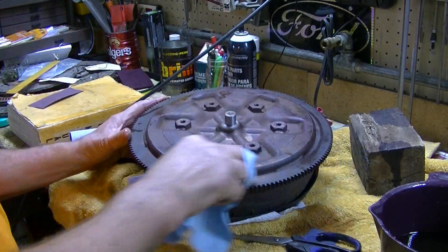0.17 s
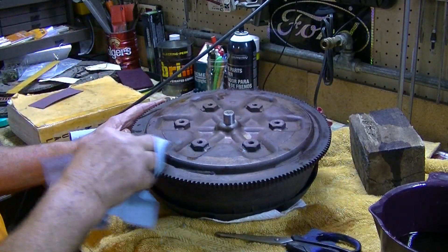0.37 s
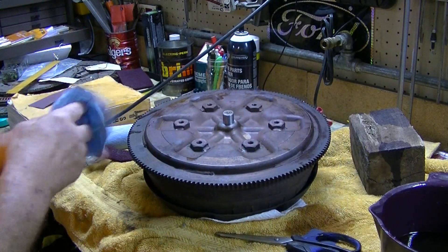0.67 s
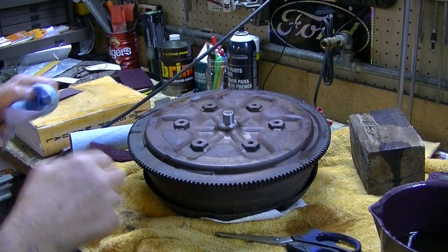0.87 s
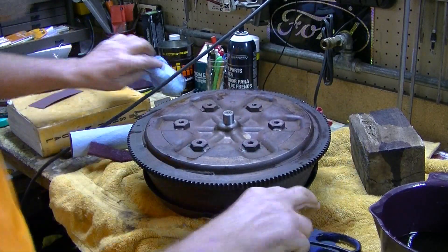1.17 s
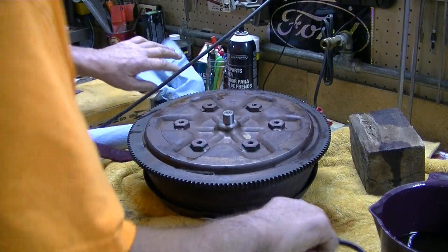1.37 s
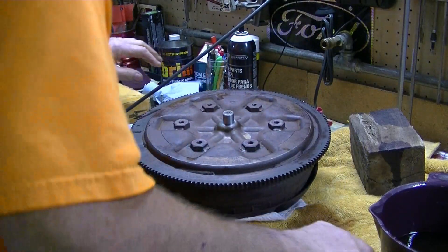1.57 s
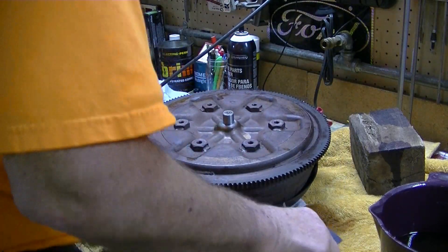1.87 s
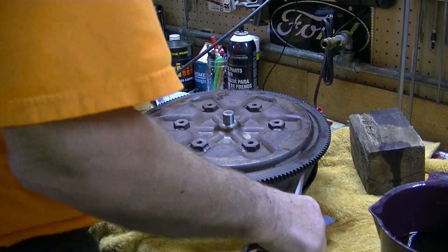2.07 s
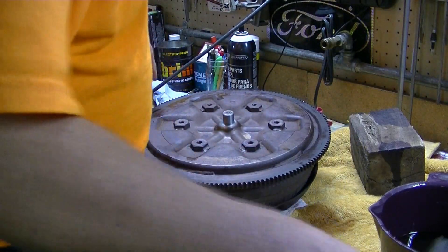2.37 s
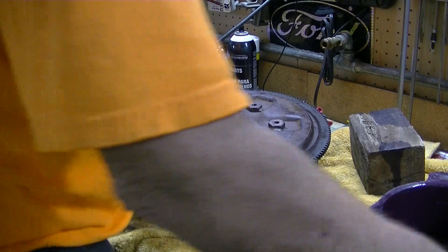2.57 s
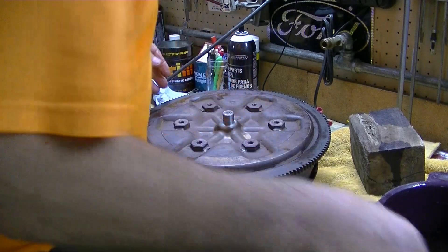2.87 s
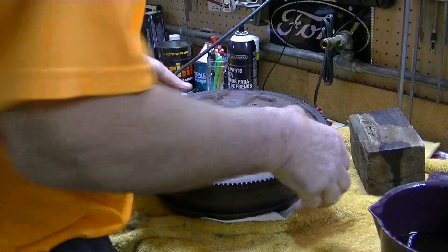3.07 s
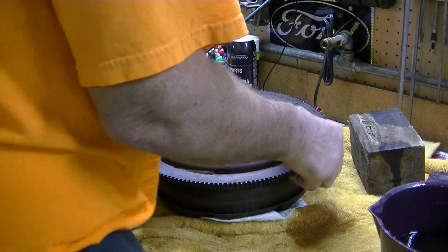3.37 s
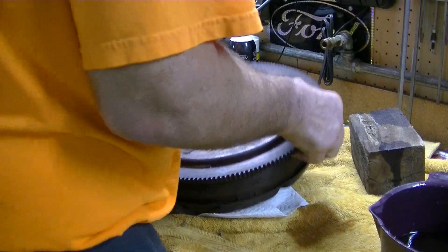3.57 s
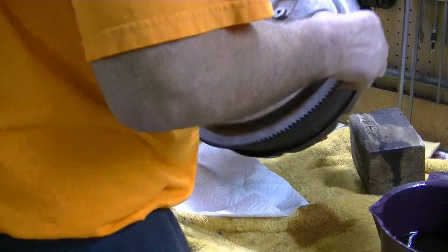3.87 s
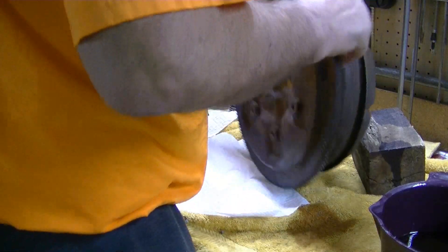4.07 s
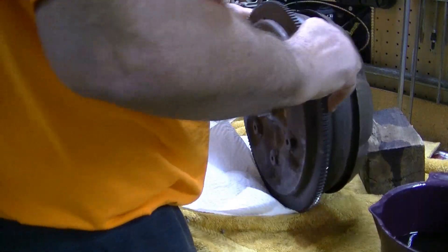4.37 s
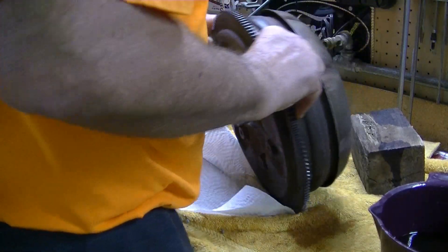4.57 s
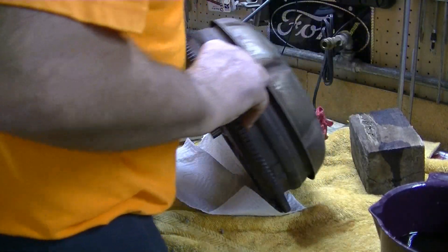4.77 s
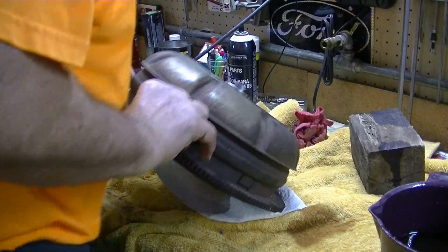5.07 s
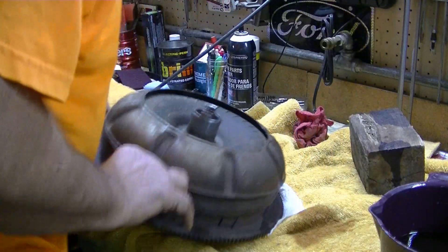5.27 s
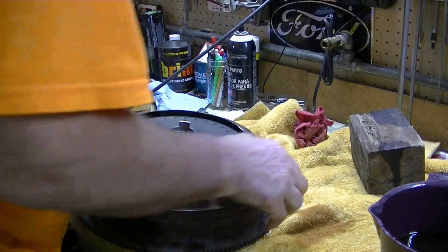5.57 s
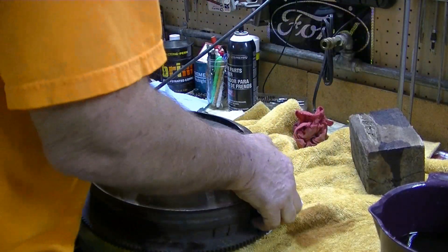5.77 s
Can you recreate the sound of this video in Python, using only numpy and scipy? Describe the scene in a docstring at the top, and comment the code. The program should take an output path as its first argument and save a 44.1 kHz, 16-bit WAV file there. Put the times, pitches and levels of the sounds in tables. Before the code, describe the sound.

Close to the camera microphone in a small garage, a rag hisses over metal and sleeves rustle. Sharp tool clacks peak just after two seconds, then tools clatter into a heap. A heavy steel part lands on its rim with a loud clank and thud, rocks with ringing knocks, and finally scrapes against a toothed plate as it is laid over. Faint lens ticking and hiss underneath.

```python
"""A garage workbench, close to a camera: a rag wipes a torque converter, sleeves and a towel rustle (shaped noise).
Steel hand tools clack and are pushed into a heap: grainy bursts through damped modes that then ring free.
The converter is tipped onto its rim, it clanks and rocks as it settles, and it is lowered upside down while the
flex plate scrapes and rings (noise-fed modes). Knocks and low thuds carry the weight on the bench.
The camera's lens drive ticks softly in three runs over quiet hiss."""
import sys
import numpy as np
from scipy import signal
from scipy.fft import rfft, irfft, next_fast_len
from scipy.io import wavfile
from scipy.ndimage import uniform_filter1d, map_coordinates

SR = 44100
rng = np.random.default_rng(int(sys.argv[2]) if len(sys.argv) > 2 else 0)


def inscribe(sig):
    """Save sig as 16-bit PCM at rate SR to the path in sys.argv[1].

    A 1-D sig is mono; a 2-D sig holds one channel per row.
    Samples are clipped to [-1, 1] before scaling.
    """
    pcm = np.round(np.clip(np.atleast_2d(sig).T, -1, 1) * 32767)
    wavfile.write(sys.argv[1], SR, pcm.astype(np.int16))


N = 260190

# noise colour of a bright steel crack: (frequency [Hz], level [dB])
CRACK_COLOUR = [(60, -55), (200, -35), (700, -70), (1300, -42), (1900, -3.5), (2800, -1), (4000, 7),
                (6000, 8), (7500, 2.5), (9500, -13.5), (12000, -17), (16000, -43)]
# noise colour of a dull knock: (frequency [Hz], level [dB])
KNOCK_COLOUR = [(60, -67.5), (160, -12), (300, -25.5), (600, -14.5), (1000, -2), (1700, 0), (3000, -8),
                (5000, -4.5), (12000, -25)]


def amp(db):
    """Decibels to an amplitude factor."""
    return 10 ** (np.asarray(db) / 20)


def unit(x):
    """Scale to an rms of 1."""
    return x / np.sqrt(np.mean(x ** 2) + 1e-20)


def along(points, hz):
    """Read (Hz, value) points on a log frequency axis."""
    f, v = np.transpose(points)
    return np.interp(np.log(hz + 1), np.log(f + 1), v)


def add(track, s, sound):
    """Mix a sound into a track from time s [s]."""
    part = track[..., max(round(s * SR), 0):][..., :sound.shape[-1]]
    part += sound[..., :part.shape[-1]]


def wobble(rate):
    """A smooth random curve through so many random knots a second."""
    knots = rng.standard_normal(int(N * rate / SR) + 4)
    return map_coordinates(knots, [np.arange(N) * rate / SR])


def filtered(x, response):
    """Multiply the spectrum by a (complex) response of frequency."""
    n = x.shape[-1]
    m = next_fast_len(n + SR // 8)
    return irfft(rfft(x, m) * response(np.fft.rfftfreq(m, 1 / SR)), m)[..., :n]


def resonate(x, peaks):
    """Pass x through parallel damped resonances (Hz, width Hz, dB) of alternating sign."""
    def response(f):
        total = 0
        for k, (centre, width, db) in enumerate(peaks):
            damping = 1j * f * width
            total = total + (-1) ** k * amp(db) * damping / (centre * centre - f * f + damping)
        return total
    return filtered(x, response)


def coloured(x, spectrum, size=1024):
    """Minimum-phase colouring that keeps attacks sharp and white noise at its level."""
    cepstrum = irfft(np.log(amp(along(spectrum, np.fft.rfftfreq(size, 1 / SR)))))
    # folding the cepstrum forward makes the filter causal
    cepstrum[1:size // 2] *= 2
    cepstrum[size // 2 + 1:] = 0
    pulse = irfft(np.exp(rfft(cepstrum)))
    return signal.fftconvolve(x, pulse / np.linalg.norm(pulse))[:len(x)]


def spread(pair, spectrum, alike):
    """Two unrelated noises become coloured, partly alike channels with a joint rms of 1."""
    def mid_side(hz):
        turn = np.arccos(np.clip(along(alike, hz), -1, 1)) / 2
        return amp(along(spectrum, hz)) * [np.cos(turn), np.sin(turn)]
    mid, side = filtered(pair, mid_side)
    return unit(np.array([mid + side, mid - side]))


def lean(x):
    """The bench lies to the right and the camera body shades the left port, by frequency."""
    # (frequency [Hz], left minus right [dB])
    port_balance = [(100, -1), (400, -4), (1200, -3.5), (3000, -4), (4700, -0.5), (7000, -3.5),
                    (8200, -1.5), (9200, -18), (10500, 5), (12000, -4), (16000, 3)]
    return filtered(x, lambda hz: amp(np.outer([1, -1], along(port_balance, hz)) / 2))


def garage(x, wet_db, alike):
    """Direct sound with a phase offset between two ports, then a tail that dies sooner in the treble."""
    # (frequency [Hz], tail t60 [s])
    tail_t60 = [(60, 0.97), (300, 0.73), (1500, 0.21), (5000, 0.23), (9000, 0.16), (15000, 0.12)]
    # (frequency [Hz], phase between the ports [rad])
    port_phase = [(100, 0), (4000, 0.53), (6000, 0.05), (8000, -1.5), (9500, -5.5), (12000, -6.5),
                  (13500, 4)]
    hz, t, z = signal.stft(rng.standard_normal((3, SR // 2)), SR, nperseg=256)
    decay = amp(-60 * t / along(tail_t60, hz)[:, None])
    build_up = 1 - np.exp(-t / 0.0033)
    tails = signal.istft(z * decay * build_up, SR, nperseg=256)[1]
    share = np.clip(alike, 0, 1)
    tail = np.sqrt(share) * tails[2] + np.sqrt(1 - share) * tails[:2]
    tail = tail / np.linalg.norm(tails[2])
    direct = filtered(x, lambda hz: np.exp(.5j * np.outer([1, -1], along(port_phase, hz))))
    return direct + amp(wet_db) * signal.fftconvolve(x[None], tail, axes=1)[:, :len(x)]


def contacts(hits, modes, spectrum, gain_db, wet_db, grain_db, knock_db, knock_t60, damped_hz, body_db,
             ring_share, snap_db=13, snap_rise=0.00013, favours_db=4.0):
    """Steel on steel: tiny impacts drive the modes, damped wide while the parts touch; then they ring free."""
    # a contact's treble shelf rises between these two [Hz]
    shelf_hz = (3370, 8830)
    # build-up as a share of the rattle for a contact at hard_db; harder contacts bite sooner
    rise_share, hard_db, hardening = 0.013, -11.5, 0.69
    out, t = np.zeros((2, N)), np.arange(SR // 4) / SR
    hz, level, t60 = np.transpose(modes)[:, :, None]
    # hands and towel cut the free ring short
    partials = amp(level - 60 * t / (ring_share * t60)) * np.exp(2j * np.pi * hz * t)
    partials = partials / np.linalg.norm(amp(level))
    for s, db, rattle, treble_db, ring_db in hits:
        rise = rise_share * rattle * amp(hardening * (hard_db - db))
        attack = 1 - np.exp(-t / rise)
        # each grain of 21 samples has its own random level
        grains = amp(grain_db * rng.standard_normal(len(t) // 21)).repeat(21)
        chatter = unit(rng.standard_normal(len(t)) * grains)
        burst = chatter * amp(-60 * t / rattle) * attack
        # contacts that bite soonest open with the strongest clean snap
        burst[0] += amp(snap_db) * np.exp(-rise / snap_rise)
        # each point of contact favours other modes
        favour_db = favours_db * rng.standard_normal(len(modes))
        damped = [(f, damped_hz * np.sqrt(f / 5000), mode_db + extra)
                  for (f, mode_db, _), extra in zip(modes, favour_db)]
        body = amp(body_db) * burst.std() * unit(resonate(burst, damped))
        strengths = amp(favour_db) * np.exp(2j * np.pi * rng.random(len(modes)))
        ring = amp(ring_db) * (strengths @ partials).imag * attack
        knock = coloured(rng.standard_normal(len(t)) * amp(knock_db - 60 * t / knock_t60), KNOCK_COLOUR)
        blow = coloured(burst, spectrum) + body + ring + knock
        # each contact has its own brightness
        shelf = list(zip(shelf_hz, (0, treble_db)))
        blow = filtered(blow, lambda f: amp(along(shelf, f)))
        add(out, s, garage(amp(db + gain_db) * blow, wet_db, alike=0.57))
    return out


def background(floor_db=-60):
    """Quiet room and microphone hiss: steady coloured noise, partly alike in the two channels."""
    # (frequency [Hz], relative level [dB])
    floor_colour = [(25, -13), (45, -9.5), (80, -3.5), (150, -1.5), (250, 0.5), (400, -4), (600, -10),
                    (900, -13.5), (1150, -16.5), (1500, -13), (2400, -10.5), (6000, -16.5), (8100, -15),
                    (14800, -20.5), (16000, -39)]
    # (frequency [Hz], left-right likeness [-1 to 1])
    floor_alike = [(60, -0.27), (180, -0.38), (550, -0.35), (1650, -0.9), (4970, -0.39), (15000, 0.57)]
    return amp(floor_db) * spread(rng.standard_normal((2, N)), floor_colour, floor_alike)


def pressure(waver_db=1.05):
    """Levels of the cloth's hiss, body and fizz: separate strokes over the sleeves' rustle."""
    # sleeves and towel rustling while the arms move, before the waver and band trims: (time [s], level [dB])
    sleeve_levels = [(0, -49.5), (.5, -54), (.56, -64.5), (.68, -51), (1.0, -48), (1.25, -54.5),
                     (1.45, -49.5), (2.12, -51.5), (2.26, -59), (2.4, -61.5), (2.9, -57), (3.02, -65.5),
                     (3.38, -60.5), (3.6, -57.5), (3.93, -56.5), (4.1, -45), (4.7, -50.5), (5.02, -56),
                     (5.3, -54), (5.9, -61.5)]
    # rag and sleeve strokes, before the band trims:
    # (start [s], length [s], hiss [dB], dull body [dB re hiss], fizz [dB re hiss])
    rag_strokes = [(-.04, 0.5, -38, -16, -11), (0.363, .11, -38, -13.5, -13),
                   (0.698, 0.044, -42.5, -10, -13.5), (0.778, 0.067, -44.5, -9, -14),
                   (.89, 0.064, -43.5, -26, -13), (1.022, 0.042, -45.5, -5, -32),
                   (1.323, 0.1, -42.5, -8, -16.5), (1.478, 0.087, -45, -8, -10.5),
                   (1.589, 0.095, -49, -6, -10.5), (1.8, 0.031, -53.5, -12, -1.5),
                   (2.076, 0.036, -41.5, -9, -4), (2.352, 0.026, -46, -25, -17),
                   (2.449, 0.012, -49, -18, -15), (2.496, 0.067, -53, -9, -13.5),
                   (2.619, 0.056, -36, -8.5, -13), (2.703, 0.023, -42.5, -14, -14.5),
                   (3.242, 0.027, -54, -10, -12), (3.59, 0.041, -59, 4, -5), (4.007, 0.15, -45.5, -17, -6),
                   (4.042, 0.072, -40.5, -23, -7), (4.755, 0.081, -47.5, -4.5, -20),
                   (5.185, 0.12, -50, -11, -11.5), (5.346, 0.064, -46.5, -6.5, -14.5),
                   (5.754, 0.13, -44, -12.5, -11.5)]
    # the rustle's body grows slower than its hiss, from a middling pressure
    middling_db, body_offset_db, body_growth = -52, -3, 0.71
    sleeve_fizz_db = -12.5  # re the rustle's hiss
    edge_s, edge_share = 0.0019, 0.043  # strokes start and stop softly, longer ones more so
    t = np.arange(N) / SR
    rustle_db = np.interp(t, *np.transpose(sleeve_levels)) + waver_db * wobble(20)
    body_db = middling_db + body_offset_db + body_growth * (rustle_db - middling_db)
    power = amp([rustle_db, body_db, rustle_db + sleeve_fizz_db]) ** 2
    for start, length, db, dull_db, fizz_db in rag_strokes:
        edge = edge_s + edge_share * length
        onset = (1 + np.tanh((t - start + edge) / edge / 2)) / 2
        release = (1 + np.tanh((start + length + edge - t) / edge / 2)) / 2
        stroke = onset * release
        power += np.outer(amp([db, db + dull_db, db + fizz_db]) ** 2, stroke ** 2)
    return np.sqrt(power)


def cloth(grain_db=0.75, flutter_db=1):
    """Fibres catch and slip: fluttering noise in three bands that follow the pressure of each stroke."""
    # (frequency [Hz], relative level [dB])
    cloth_colour = [(180, -56), (300, -21.5), (528, -24.5), (828, -20.5), (1230, -17), (1810, -8.5),
                    (1970, -9), (2170, -8), (3130, -7.5), (5080, -2.5), (6000, -1.5), (7950, -12.5),
                    (9390, -16.5), (16000, -29.5)]
    # (frequency [Hz], left-right likeness [-1 to 1])
    cloth_alike = [(300, -0.21), (1400, 0.75), (3000, 0.76), (6500, 0.87), (9000, 0.24), (15000, -0.22)]
    hiss, body, fizz = pressure()
    slips = rng.standard_normal((2, N)) * amp(grain_db * wobble(900) + flutter_db * wobble(56))
    rub = lean(spread(slips, cloth_colour, cloth_alike))

    def below(edge_hz):
        """The rub's part below an edge."""
        return filtered(rub, lambda hz: 1 / (1 + (hz / edge_hz) ** 8))
    low, dull = below(edge_hz=3430), below(edge_hz=6620)
    hiss_band = amp(-3.0) * hiss * unit(dull - low)
    body_band = amp(-3.0) * body * unit(low)
    fizz_band = amp(5.0) * fizz * unit(rub - dull)
    return hiss_band + body_band + fizz_band


def hand_tools():
    """Hand tools touch: short cracks and a brief ring of their own modes."""
    # (time [s], level before the group gain [dB], rattle t60 [s], treble [dB], free ring re the blow [dB])
    tool_touches = [(.3535, -13, 0.0024, 4, -30), (.6825, -27.5, 0.011, 17, -31),
                    (.82, -25.5, 0.041, -6, -22), (1.402, -28, 0.08, 11, -26), (1.620, -28, 0.055, 3, -8),
                    (1.726, -23.5, 0.05, 0, -27), (1.972, -16.5, 0.0072, 1, -33),
                    (1.982, -28.5, 0.061, 10.5, -23), (2.063, -19, 0.014, -1, -21),
                    (2.08, -26, 0.061, 7, -18), (2.095, -23, 0.067, 10.5, -11.5),
                    (2.1712, 0, 0.0046, -1.5, -26.5), (2.173, -13, 0.036, 3, -8),
                    (2.515, -32, 0.032, -5, -24)]
    # (frequency [Hz], level [dB], t60 before hands shorten it [s])
    tool_modes = [(1330, -19, .28), (2191, -8, .32), (2455, -13, .19), (3280, -3, .26), (3750, -4, .09),
                  (4323, -10, .19), (4505, -1, .22), (5389, 2, .19), (5636, -6, .22), (6406, -5, .18),
                  (7510, -16, .2)]
    return contacts(tool_touches, tool_modes, CRACK_COLOUR, gain_db=-8.0, wet_db=-11.5, grain_db=4.5,
                    knock_db=-45, knock_t60=0.025, damped_hz=110, body_db=-8, ring_share=0.72)


def tap(peaks, t60, low_hz, rattle_db=-25):
    """A click and a faint decaying rattle excite small resonances; bass is cut and the peak set to 1."""
    t = np.arange(SR // 20) / SR
    push = (t == 0) + amp(rattle_db - 60 * t / t60) * rng.standard_normal(len(t))
    bass_cut = signal.butter(4, low_hz, "high", fs=SR, output="sos")
    sound = signal.sosfilt(bass_cut, resonate(push, peaks))
    return sound / np.abs(sound).max()


def lens(step_hz=29.97, step_db=-1, first_step=0.042, casing_db=-5, casing_lag=0.0051):
    """The lens drive engages with a click, then steps regularly and shakes the camera casing."""
    # (start [s], stop [s], first click [dB], tick before trim and scatter [dB])
    drive_runs = [(1.0557, 2.158, -31, -48.5), (3.408, 4.223, -25.5, -46), (5.294, 5.8, -29.5, -47.5)]
    # resonances of the engaging click: (frequency [Hz], width [Hz], level [dB])
    click_peaks = [(1432, 55, -2), (1890, 73, -10), (2626, 100, -5.5), (3260, 160, -23)]
    # resonances of the lighter steps, before detuning: (frequency [Hz], width [Hz], level [dB])
    tick_peaks = [(1472, 72, 4.5), (2760, 100, -3.5)]
    # resonances of the camera casing: (frequency [Hz], width [Hz], level [dB])
    casing_peaks = [(220, 162, 0.7), (357, 153, -4)]
    # no two steps are alike, spread of: (time [s], level [dB], pitch [share])
    step_scatter = (.001, 1.2, .03)
    ticks, shakes = np.zeros(N), np.zeros((2, N))
    for start, stop, click_db, tick_db in drive_runs:
        add(ticks, start, amp(click_db) * tap(click_peaks, t60=0.011, low_hz=1350))
        for s in np.arange(start + first_step, stop, 1 / step_hz):
            late, extra_db, detune = step_scatter * rng.standard_normal(3)
            detuned = [(hz * (1 + detune), width, db) for hz, width, db in tick_peaks]
            tick = tap(detuned, t60=.012, low_hz=1200)
            add(ticks, s + late, amp(tick_db + step_db + extra_db) * tick)
            # the casing rattles differently at each port
            shake = np.array([tap(casing_peaks, t60=0.014, low_hz=144, rattle_db=-12.5) for port in range(2)])
            shake_db = tick_db + casing_db + rng.standard_normal()
            add(shakes, s + late + casing_lag, amp(shake_db) * shake)
    return ticks + shakes


def bench(boards_t60=0.079, frame_t60=0.013, knock_t60=0.061):
    """The towel softens each blow into a knock and a thud of the boards; the full weight also rocks the frame."""
    # weight on the bench: (time [s], knock [dB], boards peak [dB], frame peak [dB])
    weight_thumps = [(2.684, -27.5, -42, -80), (2.758, -38, -50, -80), (2.813, -26, -53, -80),
                     (4.23, -32.5, -39.5, -35), (4.239, -24, -35, -38), (4.265, -26.5, -58, -49),
                     (4.295, -33, -46, -59), (4.421, -30, -61, -59), (5.627, -38, -49.5, -72)]
    # (frequency [Hz], width [Hz], level [dB])
    board_peaks = [(128, 45, -10.5), (168, 31, 0.5), (270, 160, -3.5), (344, 52, 1.5), (507, 72, -7.5)]
    # (frequency [Hz], width [Hz], level [dB])
    frame_peaks = [(57.4, 23, 3.5), (79, 22, 0), (130, 45, 1)]
    out, t = np.zeros(N), np.arange(SR // 2) / SR
    for s, knock_db, boards_db, frame_db in weight_thumps:
        knock = coloured(rng.standard_normal(len(t)) * amp(knock_db - 60 * t / knock_t60), KNOCK_COLOUR)
        boards = resonate(rng.standard_normal(len(t)) * amp(-60 * t / boards_t60), board_peaks)
        frame = resonate(t * amp(-60 * t / frame_t60), frame_peaks)  # one low push
        boards = amp(boards_db) * boards / np.abs(boards).max()
        frame = amp(frame_db) * frame / np.abs(frame).max()
        add(out, s, knock + boards + frame)
    return garage(out, wet_db=-9.5, alike=0.79)


def tool_heap():
    """Tools shoved into a heap: a dense run of contacts with longer rattles."""
    # (time [s], level before the group gain [dB], rattle t60 [s], treble [dB], free ring re the blow [dB])
    heap_touches = [(2.7425, -9, 0.017, -1, -10), (2.753, -11, 0.094, 11.5, -25),
                    (2.757, 4.5, .022, -8.5, -12), (2.767, -9.5, 0.21, -10, -9),
                    (2.782, -23, 0.066, 21, -21), (2.799, -10, 0.14, -3, -26), (2.812, -11, 0.021, 3, -18),
                    (2.8293, -1.5, 0.031, 5.5, -31), (2.844, -18, 0.093, 4, -30),
                    (2.847, -2, 0.019, 2.5, -29), (2.862, -15, 0.073, -9, -26),
                    (2.884, -15, 0.066, -1, -25)]
    # (frequency [Hz], level [dB], t60 before it is cut short [s])
    heap_modes = [(1586, -10, .25), (1890, -8, .2), (2670, 2, .2), (2908, -3, .22), (3210, -2, .22),
                  (3680, -2, .22), (4026, 3, .22), (4540, -2, .22), (5282, -1, .25), (5625, 1, .25),
                  (5938, 2, .25), (6200, 1, .25), (6927, -2, .25), (9540, -11, .2)]
    return contacts(heap_touches, heap_modes, CRACK_COLOUR, gain_db=-8.5, wet_db=-13, grain_db=4.5,
                    knock_db=-33, knock_t60=0.094, damped_hz=80, body_db=-4.5, ring_share=0.53)


def converter():
    """The converter lands and rocks as it settles; its shell's many modes clank."""
    # (time [s], level before the group gain [dB], rattle t60 [s], treble [dB], free ring re the blow [dB])
    converter_clanks = [(4.213, -28, 0.079, 1, -16), (4.2325, -5, 0.17, -8.5, -22),
                        (4.2382, 3, 0.034, -30, -34), (4.2595, -13, 0.069, 12, -23),
                        (4.2635, 0, 0.015, 5.5, -18), (4.2892, -9.5, 0.12, -3.5, -11),
                        (4.3312, -6, 0.04, -9.5, -3), (4.3735, -6.5, 0.045, 8, -1.5),
                        (4.418, -10, 0.099, 2.5, -3.5), (4.491, -9, 0.063, 4, -1.5),
                        (4.5495, -13, 0.027, 0.5, -2), (4.585, -12, 0.019, -1.5, -8),
                        (4.6148, -15.5, 0.039, 4, -7), (4.632, -20, 0.051, 1, -7),
                        (4.778, -32, .057, -8, -12), (4.836, -28.5, 0.11, -3, -10),
                        (5.5168, -30.5, .02, -5, 1.5), (5.5598, -20, 0.041, -16, -23),
                        (5.616, -20, 0.065, 6, -1.5), (5.655, -29, 0.07, 10, -22)]
    # (frequency [Hz], level [dB], t60 before hands and towel shorten it [s])
    shell_modes = [(1586, -15, .3), (1793, -17, .4), (2622, -12, .3), (3009, -16, .45), (3400, -15, .3),
                   (3953, -6, .3), (4090, -1, .3), (4425, -4, .35), (4540, -8, .3), (4702, -5, .3),
                   (4785, -1, .35), (5082, -9, .35), (5260, -5, .3), (5560, -7, .35), (5883, 0, .33),
                   (5965, -2, .33), (6140, -3, .3), (6680, -6, .28), (7214, -14, .3), (7550, -14, .2),
                   (8064, -11, .22), (9421, -14, .28), (9550, -14, .28), (10120, -15, .22),
                   (11950, -19, .12), (12450, -20, .12)]
    # (frequency [Hz], level [dB])
    clash_colour = [(60, -42), (200, -18), (700, -17.5), (1300, -69), (1900, 0.5), (2800, 2), (4200, 9.5),
                    (6000, 8), (7500, 4), (9500, -6.5), (12500, -15), (16000, -16)]
    return contacts(converter_clanks, shell_modes, clash_colour, gain_db=-10.0, wet_db=-9, grain_db=3.0,
                    knock_db=-29.5, knock_t60=0.12, damped_hz=64.0, body_db=-4.0, ring_share=0.32)


def plate(narrow_hz=3, damping_hz=50):
    """Dragging feeds the flex plate's modes; the point of contact picks which ones sing."""
    # the rim dragging: (time of the crest [s], level [dB], swell time constant [s], fade time constant [s],
    # where it rings most [Hz], spread [octaves])
    rim_scrapes = [(4.85, -53, 0.015, 0.052, 2820, 0.33), (5.211, -60, 0.08, 0.091, 1730, 0.075),
                   (5.382, -35, 0.0075, 0.013, 5630, 0.4), (5.383, -45, 0.013, 0.091, 1720, 0.035),
                   (5.646, -50.5, 0.013, 0.083, 2000, 0.38), (5.806, -33.5, 0.0064, 0.013, 3735, 0.71),
                   (5.855, -34.5, 0.022, 0.023, 2850, 0.4), (5.86, -55, .03, 0.064, 1520, 0.044)]
    # (frequency [Hz], level before the contact's weighting [dB])
    plate_modes = [(1520, -6), (1700, -9), (2277, -5), (2406, -4), (2550, 0), (3192, -8), (4250, -3),
                   (4522, 0), (4737, -3), (5017, -5), (5792, -1), (6218, -1), (6568, -4), (7370, -2),
                   (9916, -10)]
    out = np.zeros(N)
    lag = np.arange(SR // 2) / SR - .15  # time from the crest
    for s, db, swell, fade, centre_hz, octaves in rim_scrapes:
        stroke = np.exp(np.minimum(lag / swell, -lag / fade))
        # a light touch sings few narrow modes; a broad contact damps them all
        width_hz = narrow_hz + damping_hz * octaves
        modes = []
        for hz, level in plate_modes:
            distance = np.log2(hz / centre_hz) / octaves
            modes.append((hz, width_hz, level - 1.4 * min(distance ** 2, 20)))
        singing = resonate(rng.standard_normal(SR), modes)[-len(lag):]
        # friction holds the swing steady while the rim slides
        swing = np.sqrt(np.abs(uniform_filter1d(singing ** 2, size=512)) + 1e-20)
        add(out, s + lag[0], amp(db) * stroke * singing / swing)
    return garage(out, wet_db=-18.0, alike=0.91)


def scene():
    """Tools, converter, plate, bench and cloth share the bench's lean; lens drive and hiss do not."""
    steel = hand_tools() + tool_heap() + converter() + plate()
    return lean(steel + bench()) + cloth() + lens() + background()


def record(dry, low_cut_hz=36, top_hz=16100):
    """The microphone sheds the deepest bass; loud peaks round off at full scale; a steep cut ends the treble."""
    bass_cut = signal.butter(2, low_cut_hz, "high", fs=SR, output="sos")
    heard = signal.sosfilt(bass_cut, dry)
    held = heard / (1 + np.abs(heard) ** 6) ** (1 / 6)
    return filtered(held, lambda hz: 1 / (1 + (hz / top_hz) ** 120))


dry = scene()
out = record(dry)
inscribe(out)
```